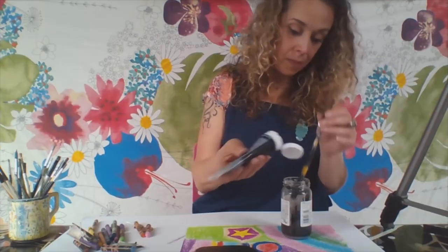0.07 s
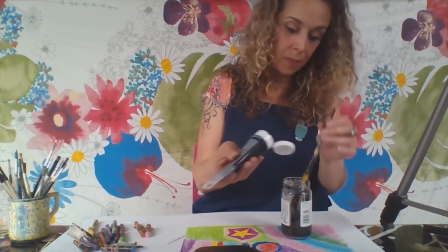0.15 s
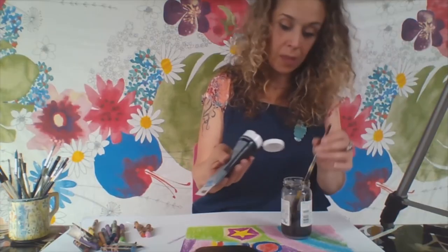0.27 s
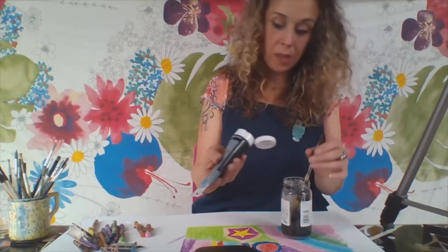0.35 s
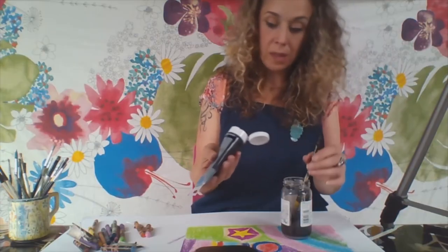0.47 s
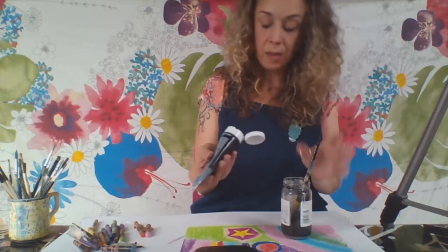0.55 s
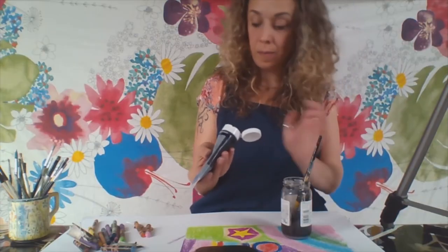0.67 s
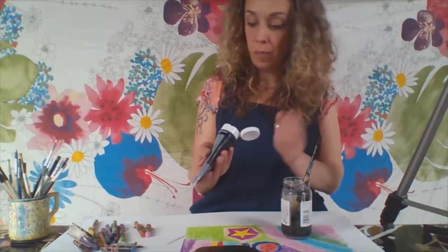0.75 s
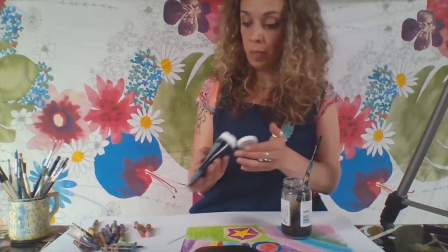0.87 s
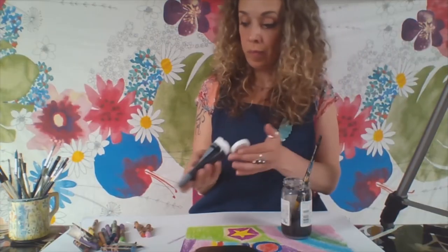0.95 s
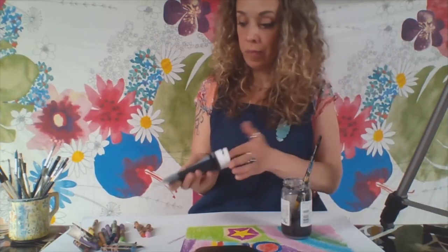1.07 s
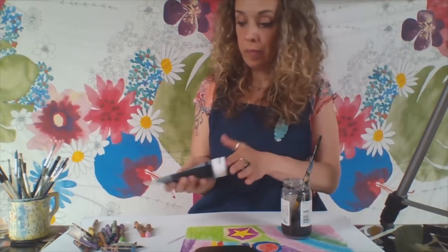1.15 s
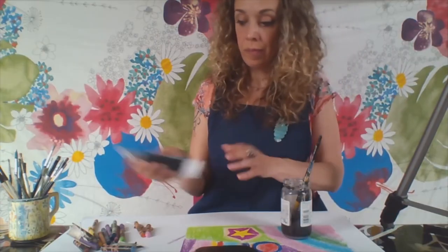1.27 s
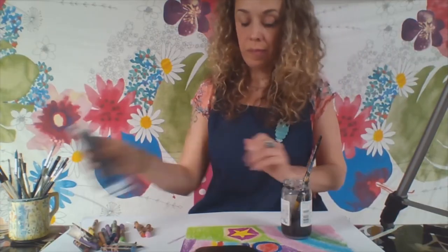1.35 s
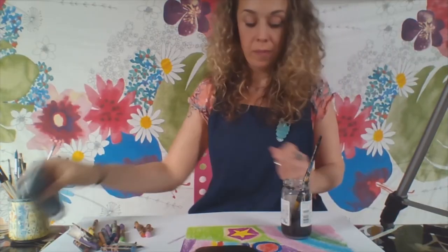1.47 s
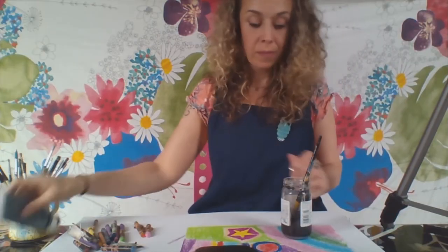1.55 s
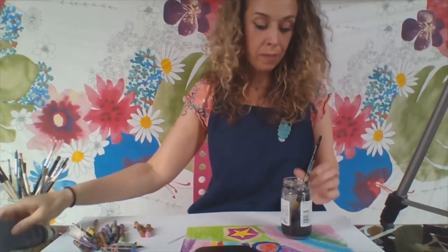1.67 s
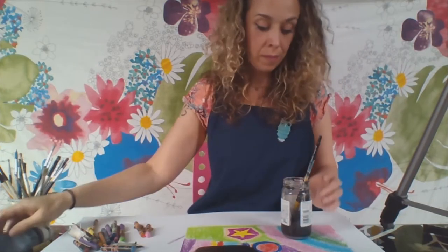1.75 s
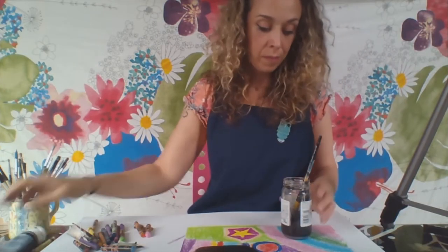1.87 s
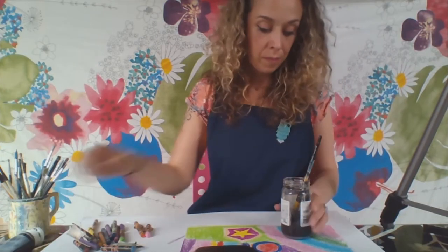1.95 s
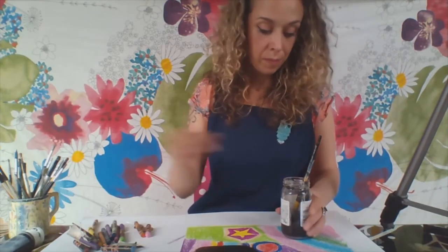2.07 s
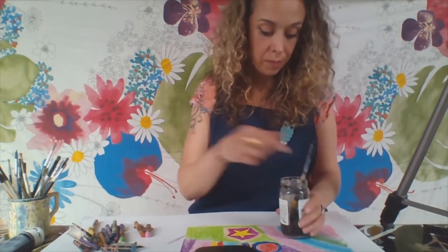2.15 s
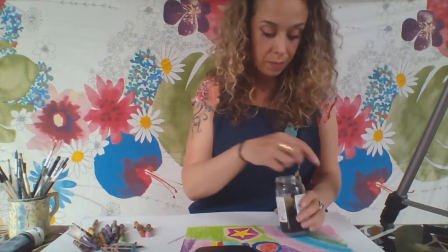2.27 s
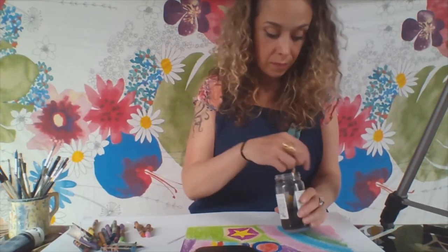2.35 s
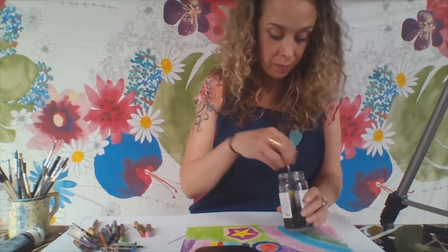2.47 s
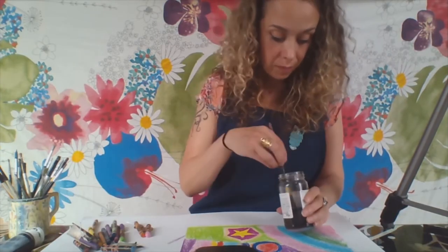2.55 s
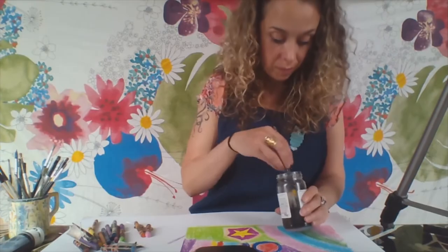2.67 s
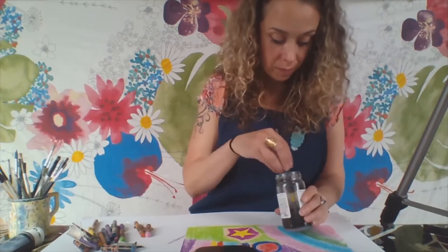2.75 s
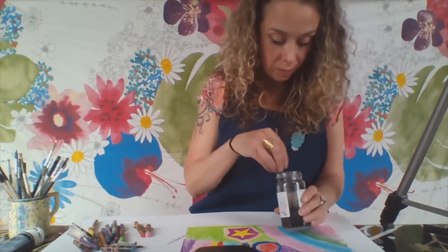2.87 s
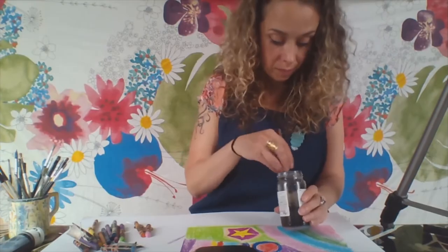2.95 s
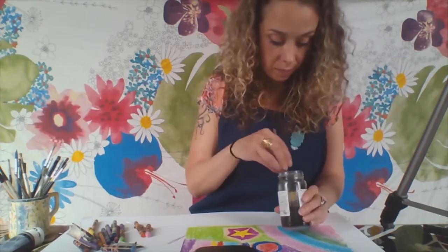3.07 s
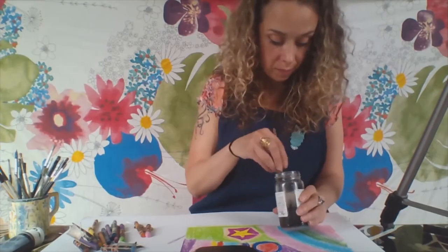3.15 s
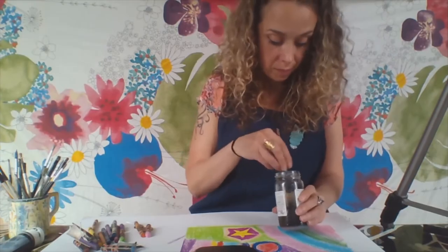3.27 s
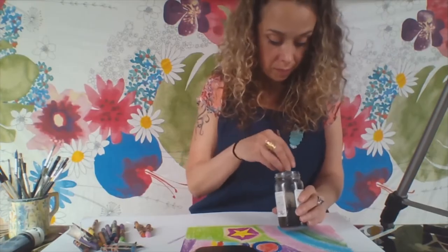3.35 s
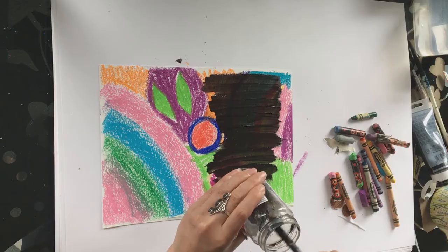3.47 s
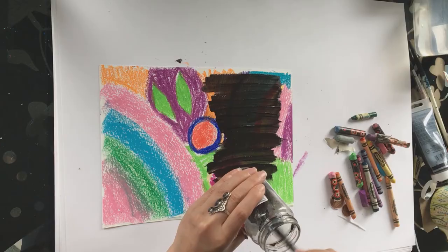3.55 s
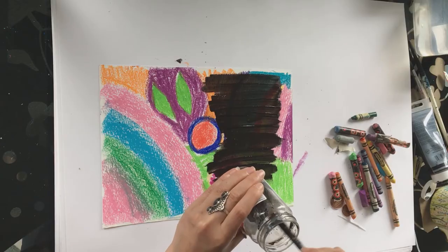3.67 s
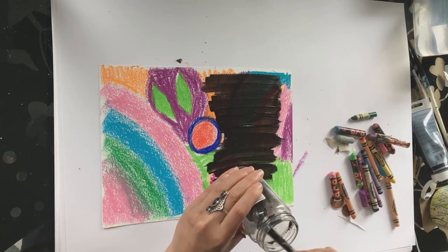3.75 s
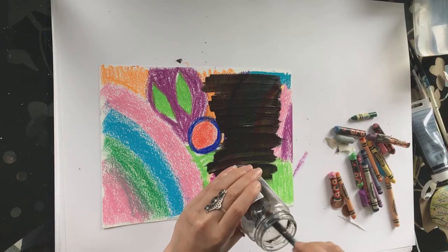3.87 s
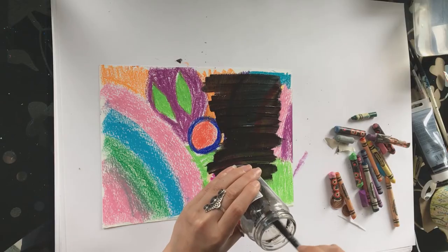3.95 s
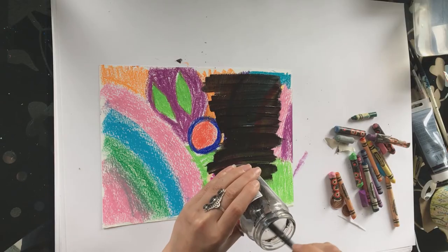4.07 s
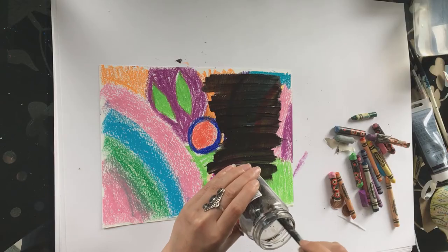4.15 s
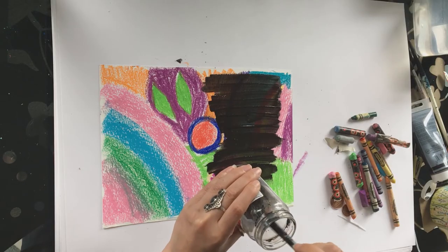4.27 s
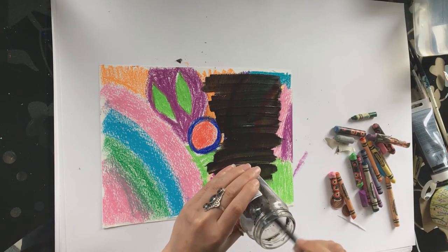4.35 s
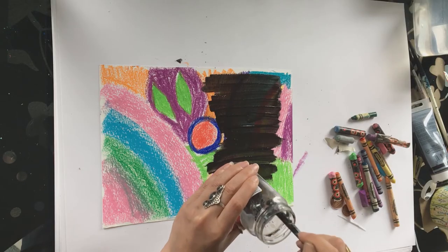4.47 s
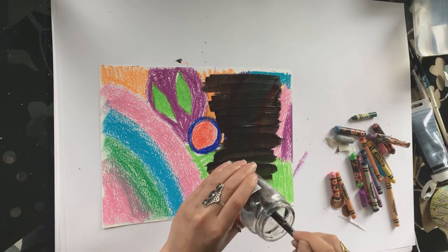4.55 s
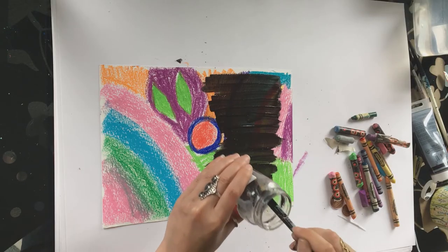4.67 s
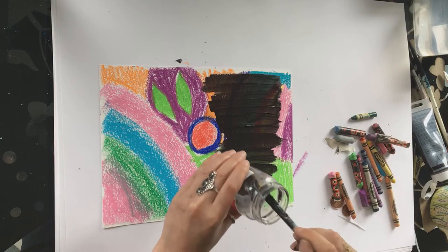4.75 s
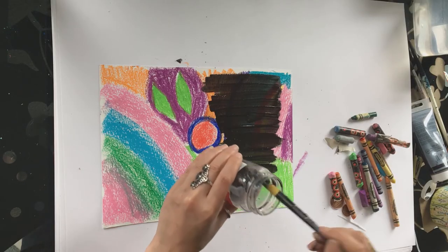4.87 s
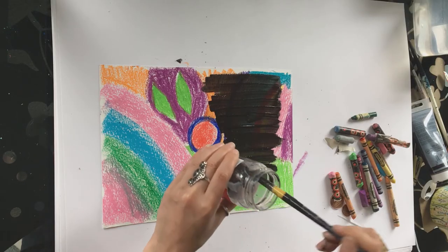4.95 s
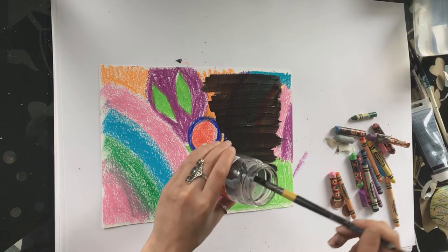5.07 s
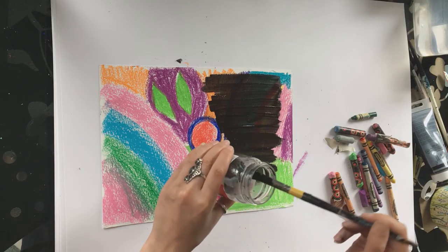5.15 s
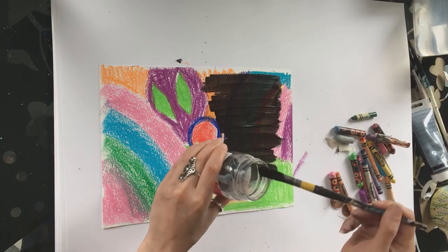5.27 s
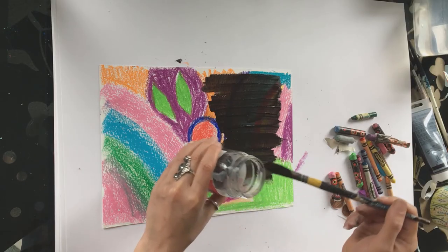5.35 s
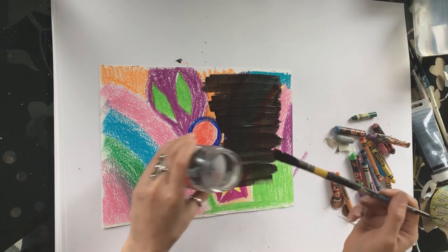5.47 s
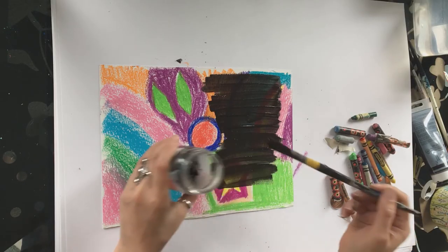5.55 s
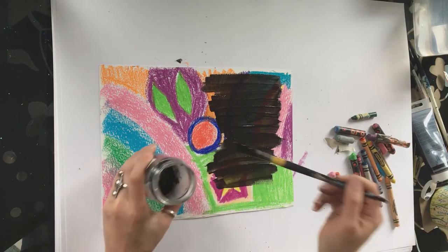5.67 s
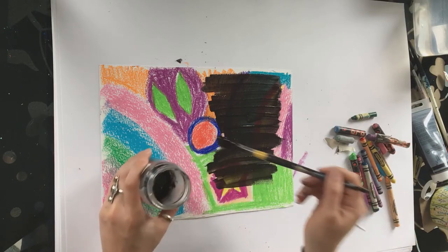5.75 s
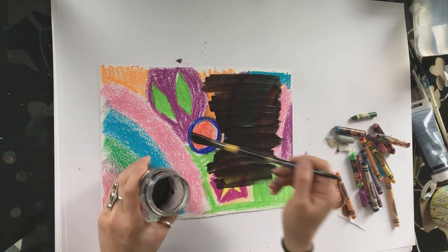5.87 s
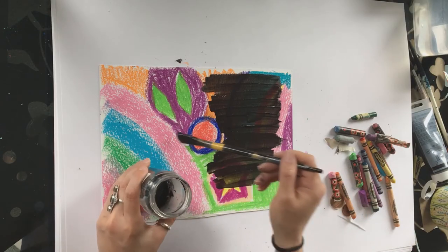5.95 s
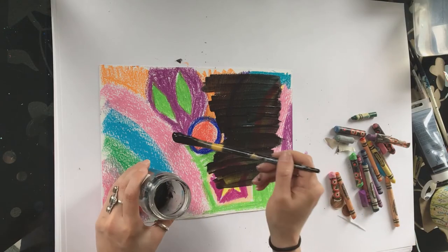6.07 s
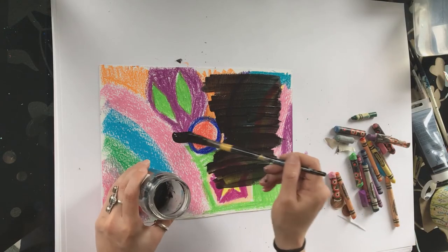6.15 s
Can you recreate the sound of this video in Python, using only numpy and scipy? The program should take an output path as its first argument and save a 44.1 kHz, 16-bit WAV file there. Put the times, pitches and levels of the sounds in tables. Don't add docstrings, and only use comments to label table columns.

```python
import sys
import numpy as np
from scipy import signal
from scipy.io import wavfile
from scipy.ndimage import uniform_filter1d

SR = 44100
rng = np.random.default_rng(int(sys.argv[2]) if len(sys.argv) > 2 else 0)


def digitize_waveform(pressure):
    field = np.atleast_2d(pressure).T
    bounded = np.clip(field, -1, 1)
    quanta = np.round(bounded * 32767).astype(np.int16)
    wavfile.write(sys.argv[1], SR, quanta)


def attenuation_scalar(level_db):
    decades = np.asarray(level_db, float) / 20
    return 10 ** decades


N = 274028

# (f/Hz, level/dB, time to fall 60 dB/s)
HAND_MODES = [(254, 2.5, 0.028), (411, 2, 0.028), (702, -7.5, 0.029), (1430, 9, 0.0091), (1780, 7, 0.014)]


def evened(x):
    return x / np.sqrt(np.mean(x ** 2) + 1e-20)


def read(points, hz):
    f, value = np.transpose(points)
    return np.interp(np.log(hz + 1), np.log(f + 1), value)


def add(mix, s, sound):
    part = mix[round(s * SR):][:len(sound)]
    part += sound[:len(part)]


def rings(modes, rise=0.00061, spread_db=0, detune=0, damp=1):
    hz, db, t60 = np.transpose(modes)[:, :, None]
    t60 = np.abs(damp * t60)
    t = np.arange(int(SR * t60.max())) / SR
    spot, size = rng.uniform(-1.15, 1, (len(modes), 2)).T[:, :, None]
    fading = attenuation_scalar(db + spread_db * size - 60 * t / t60)
    waves = fading * np.sin(2 * np.pi * hz * (1 + detune * spot) * t)
    soft_start = 1 - np.exp(-(t / rise) ** 2)
    return waves.sum(0) * soft_start


def crack(db, hz, t60, width=2.5, order=2):
    t = np.arange(2048) / SR
    limits = [hz / width, min(hz * width, .45 * SR)]
    band = signal.butter(order, limits, "bandpass", fs=SR, output="sos")
    burst = attenuation_scalar(-60 * t / abs(t60)) * rng.standard_normal(2048)
    return attenuation_scalar(db) * signal.sosfilt(band, burst)


def noise(level_db, size):
    frames, hz = 4 * N // size + 5, np.fft.rfftfreq(size, 1 / SR)
    a, b = rng.standard_normal((frames, len(hz), 2)).T
    gain = attenuation_scalar(level_db(hz[:, None], np.arange(frames) * size / 4 / SR))
    gain /= np.sqrt((gain ** 2).mean(0))
    sound = signal.istft((a + 1j * b) * gain, nperseg=size, noverlap=3 * size // 4)[1]
    return evened(sound[:N])


def coloured(x, points):
    log_gain = np.log(attenuation_scalar(read(points, np.abs(np.fft.fftfreq(2048, 1 / SR)))))
    taps = np.fft.ifft(np.exp(log_gain - 1j * signal.hilbert(log_gain).imag)).real[:1024]
    return signal.oaconvolve(x, taps)[:N]


def blow(modes, crack_db, crack_hz, tick_db, hand_db, damp, split):
    out = np.zeros(SR)
    add(out, 0, rings(modes, rise=0.00074, damp=damp))
    add(out, 0, attenuation_scalar(-3) * rings(modes, rise=0.0008, spread_db=2, detune=split, damp=.9 * damp))
    add(out, 0, crack(crack_db, crack_hz, t60=0.022, width=2.46, order=4))
    add(out, 0, crack(tick_db, hz=11300, t60=0.018, width=1.5))
    add(out, 0, attenuation_scalar(hand_db) * rings(HAND_MODES, rise=0.003, spread_db=4, detune=0.05))
    return out


def brush_drop():
    # (f/Hz, level/dB, time to fall 60 dB/s)
    loose_jar = [(676, -46, 0.16), (1900, -48, 0.05), (4165, -48, .15), (4282, -38.5, 0.36),
                 (5700, -64, 0.3), (7110, -47, 0.42), (7200, -50, 0.3), (12480, -70, .2), (14810, -71, 0.4)]
    # (time after the drop/s, level/dB)
    bounces = [
        (.058, -11),
        (.102, -12),
        (.134, -10),
    ]
    drop_s = .1942
    out = np.zeros(N)
    add(out, drop_s, blow(loose_jar, crack_db=-26, crack_hz=1900, tick_db=-43, hand_db=-32,
                          damp=1.0, split=0.0072))
    for later, bounce_db in bounces:
        add(out, drop_s + later, attenuation_scalar(bounce_db) * rings(loose_jar, rise=.003, damp=.6))
    return out


def clinks():
    # (t/s, strength/dB, hardness/dB per octave, upper rings near the rim/dB, ring length left [share])
    clink_blows = [
        (3.116, -40.5, -11.5, -12, 0.54),
        (3.1325, -46, -4, 9.5, 0.41),
        (3.489, -35.5, 1, 1, 0.5),
        (3.7969, -29, 1.5, 7, 0.4),
        (4.0706, -27, -6, -2.5, 0.52),
        (4.3673, -30, 3, -6, 0.88),
    ]
    paint_pitch = [(1.02, 1.005), (1.015, 1.007), (1.012, 1.062), (.998, 1), (.983, 1.01), (1.037, 1.035)]
    held_hz = [1295, 2070, 2280, 2570, 3960, 4125, 4330, 6250, 6560, 6880, 8030, 11100, 12450]
    # (level/dB, time to fall 60 dB/s)
    held_rings = [(-15.5, 0.019), (-12, .022), (0.5, 0.048), (-2, 0.026), (-8, 0.031), (-0.5, 0.07),
                  (-3, 0.054), (-6.5, 0.063), (-12, 0.022), (2.5, 0.036), (-15, 0.023), (-17, 0.019),
                  (-15, 0.023)]
    wall_hz = (3000, 5500, 7500)
    pivot_hz = 4100
    out = np.zeros(N)
    hz = np.array(held_hz)
    share_db, t60 = np.transpose(held_rings)
    family = np.searchsorted(wall_hz, hz)
    for (s, db, hard, upper_db, grip), pitch in zip(clink_blows, paint_pitch):
        tuned_hz = hz * np.array([1, *pitch, 1])[family]
        hardness_db = hard * np.log2(hz / pivot_hz) * (hz < wall_hz[-1])
        tone_db = db + share_db + hardness_db + upper_db * (family == 2)
        modes = np.transpose([tuned_hz, tone_db, t60])
        add(out, s, blow(modes, crack_db=db + 6 + 0.33 * hard, crack_hz=3200 * 2 ** (0.019 * hard),
                         tick_db=db - 17, hand_db=db - 3.5 - 0.56 * hard, damp=grip, split=.017))
    return out


def collar_and_set_down():
    # (f/Hz, level/dB, time to fall 60 dB/s)
    collar = [(6900, -42, .018), (8600, -38, .015), (9690, -39, .035), (11700, -36, 0.02),
              (13400, -34.5, .02)]
    # (t/s, level/dB)
    down_s, down_db = (5.9815, -34.5)
    out = np.zeros(N)
    add(out, 4.6324, blow(collar, crack_db=-40, crack_hz=7000, tick_db=-42, hand_db=-70, damp=.5, split=.02))
    add(out, down_s, attenuation_scalar(down_db) * rings(HAND_MODES, rise=.0022, damp=.7))
    return out


def drops():
    # (t/s, level/dB, start f/Hz, end f/Hz, length/s)
    glides = [
        (2.332, -63, 6200, 7000, .008),
        (2.351, -53, 5750, 5850, .014),
        (2.8, -64, 5500, 5600, .03),
        (4.452, -63, 5820, 5920, 0.06),
        (.953, -59, 7600, 9800, .04),
        (0.935, -59, 5400, 5450, .015),
        (.97, -62, 5400, 5400, .04),
        (.29, -63, 5800, 5950, .07),
    ]
    out = np.zeros(N)
    for s, db, start_hz, end_hz, length in glides:
        waver = 1 + .007 * evened(uniform_filter1d(rng.standard_normal(4410), size=200))
        hz = np.linspace(start_hz, end_hz, int(length * SR))
        turns = np.cumsum(hz * waver[:len(hz)]) / SR
        add(out, s, attenuation_scalar(db) * np.sin(2 * np.pi * turns) * np.hanning(len(hz)))
    return out


def glass():
    return brush_drop() + clinks() + collar_and_set_down() + drops()


def snap():
    # (f/Hz, level/dB, time to fall 60 dB/s)
    (s, db), modes = (1.0259, -24), [(181, -49, 0.053), (360, -28, 0.022), (480, -22, 0.012),
                      (827, -35, 0.041), (1560, -30, 0.021), (2300, -32, 0.013), (4100, -28.5, 0.0091)]
    out = np.zeros(N)
    add(out, s, rings(modes, rise=0.00049))
    add(out, s, crack(db, hz=4000, t60=0.014, width=2.8))
    return out


def knocks():
    # (f/Hz, level/dB, time to fall 60 dB/s)
    table_top = [(185, -8, 0.08), (285, -4, 0.12), (443, 2.5, 0.095), (550, 2, 0.06), (592, -4, .05)]
    tube_wall = [(1431, 2.5, 0.061), (1700, 6.5, 0.046), (1866, 1, 0.025), (2310, 5, 0.024),
                 (2670, -4.5, 0.05)]
    cap = [(3340, 4.3, 0.0092), (3900, 7.4, 0.026), (4450, 5.2, 0.027)]
    crayons = [(5950, -4, .009), (6645, 16, 0.017), (7200, -5, 0.0072)]
    # (t/s, table level/dB, tube level/dB, cap level/dB, crayon level/dB)
    hits = [(1.6036, -56, -37.5, -33.5, -48), (1.614, -66, -47, -35, -41),
            (1.702, -32.5, -22.5, -19.5, -37), (1.8464, -36, -24, -23.5, -30),
            (1.851, -32.5, -22.5, -28, -36), (1.874, -28.5, -59, -52, -56), (1.893, -22, -51, -52, -52),
            (1.8988, -20.5, -31, -30, -16.5), (1.904, -22.5, -28, -41, -36), (1.913, -35, -53, -28, -31),
            (1.929, -24, -14, -25, -38), (1.954, -26.5, -44, -46, -50), (1.9637, -28, -49, -53, -19),
            (1.967, -12.5, -26, -54, -31), (1.978, -33, -50, -58, -40), (2.016, -39, -43, -55, -51),
            (2.035, -35, -44, -60, -60), (2.0539, -35.5, -36, -64, -46.5), (5.983, -42, -58, -54, -66)]
    out = np.zeros(N)
    for s, table_db, *parts_db in hits:
        add(out, s, attenuation_scalar(table_db - 3.5) * rings(table_top, rise=0.002, detune=0.007))
        for db, body in zip(parts_db, (tube_wall, cap, crayons)):
            add(out, s, attenuation_scalar(db - 10.0) * rings(body, spread_db=4.5, detune=0.05, damp=0.69))
            add(out, s, crack(db + 4.5, body[1][0], t60=0.028, width=1.416))
        add(out, s, crack(parts_db[-1] + 5.0, hz=8950, t60=0.009, width=1.41))
    return out


def rubbing():
    # (peak t/s, level/dB, swell over 23.5 dB/s, fade over 23.5 dB/s, brightness/dB per octave)
    rubs = [(.72, -66, 0.099, .17, 10), (.975, -53.5, 0.066, 0.23, 2), (1.035, -55, .06, .09, -5),
            (1.35, -61, 0.26, 0.27, 5), (1.611, -39.5, 0.014, 0.13, 1), (1.75, -45, 0.11, 0.15, 0.5),
            (1.86, -39, 0.019, 0.033, -2.5), (1.91, -33.5, 0.035, 0.063, -1.5),
            (1.98, -33, 0.081, 0.062, -2.5), (2.07, -42, 0.24, 0.073, -4.5), (2.55, -72, .9, 0.74, 9),
            (2.95, -71, 0.43, 0.65, 8), (5.75, -67, .23, .4, 4), (5.948, -64, 0.26, 0.43, -1.5)]
    # (f/Hz, level/dB)
    rub_colour = [(300, 0), (1000, 5.5), (2000, -6), (4000, 1.5), (5000, -2.5), (6500, 0.5), (8500, -7),
                  (10500, -5), (13000, -9), (16000, -21)]
    s, level_db, swell, fade, tilt = np.transpose(rubs)[:, :, None]
    t = np.arange(N) / SR
    away = np.maximum((s - t) / np.abs(swell), (t - s) / np.abs(fade))
    power = attenuation_scalar(2 * level_db - 47 * away) + 1e-12
    bright = (power * tilt).sum(0) / power.sum(0)

    def colour_db(hz, at):
        return read(rub_colour, hz) + np.interp(at, t, bright) * np.log2((hz + 50) / 4000)

    hiss = noise(colour_db, size=256)
    grain = attenuation_scalar(2.0 * evened(uniform_filter1d(rng.standard_normal(N), size=90)))
    return np.sqrt(power.sum(0)) * evened(hiss * grain)


def thuds():
    # (t/s, level/dB, f/Hz, time to fall 60 dB/s)
    pushes = [
        (1.03, -44, 69.6, 0.25),
        (1.71, -38, 119, 0.15),
        (1.93, -47, 65, .2),
        (2.017, -37.5, 68.6, 0.33),
        (2.091, -44, 108, 0.13),
        (5.984, -38, 184, 0.066),
        (5.997, -39, 78.6, 0.07),
        (6.025, -32.5, 62.5, 0.11),
        (6.061, -39, 60, 0.067),
    ]
    out = np.zeros(N)
    for s, db, hz, t60 in pushes:
        add(out, s, rings([(hz, db, t60)], rise=0.0034))
    return out


def flicks():
    # (t/s, level/dB)
    bristle_flicks = [
        (4.063, -58),
        (4.118, -41),
        (4.143, -57),
        (2.127, -47),
        (3.063, -58),
    ]
    out = np.zeros(N)
    for s, db in bristle_flicks:
        add(out, s, crack(db, hz=11000, t60=0.0055, width=1.2))
    return out


def room(tail_db, build, echo_db):
    # (f/Hz, level/dB)
    room_colour = [(200, -7.5), (600, -3), (1500, -3.5), (4000, 1.5), (7000, -2.5), (9500, -1), (16000, 3)]
    # (f/Hz, time to fall 60 dB/s)
    room_t60 = [(200, 0.067), (1000, 0.37), (2500, 0.21), (4500, 0.23), (7000, 0.19), (12000, 0.18)]
    # (delay/s, level/dB)
    echoes = [(.0015, -6.5), (.0035, -12.5), (.0062, -12.5), (.011, -13), (.016, -11.5), (.021, -12.5),
              (.026, -19.5)]
    taps = np.zeros(SR // 2)
    at = np.arange(40, SR // 2 - 20, 20)
    taps[at + rng.integers(0, 20, len(at))] = rng.choice([-1., 1.], len(at))
    hz, t, z = signal.stft(taps, SR, nperseg=256)
    fading_db = read(room_colour, hz)[:, None] - 60 * t / read(room_t60, hz)[:, None]
    tail = signal.istft(z * attenuation_scalar(fading_db), SR, nperseg=256)[1]
    tail *= 1 - np.exp(-np.arange(len(tail)) / SR / build)
    tail *= attenuation_scalar(tail_db) / np.linalg.norm(tail)
    for k, (s, db) in enumerate(echoes):
        tail[round(s * SR)] += (-1) ** k * attenuation_scalar(db + echo_db)
    tail[0] = 1
    return tail


def air():
    # (f/Hz, level/dB per Hz)
    air_colour = [(15, -47), (25, 3), (53, 0), (232, -4.5), (496, -11), (538, -9.5), (979, -8.5),
                  (2150, -14), (2530, -11), (2750, -16.5), (4240, -20.5), (7510, -26), (13300, -30.5),
                  (15200, -33), (16500, -49)]
    # (f/Hz, width/Hz, level/dB)
    fan_modes = [(59, 26, 7), (1332, 520, 1), (1742, 18, 4), (2480, 120, 0), (3470, 1170, -6),
                 (4190, 470, -9.5), (5450, 250, -13.5)]
    change_s, dip_s, dip_db = 4.55, 0.16, -3
    since = np.arange(N) / SR - change_s
    after = np.clip(since / 0.026 + .5, 0, 1)
    dip = dip_db * np.clip(1 + since / dip_s, 0, 1) * (1 - after)

    def fan_db(f, s):
        peaks = sum(attenuation_scalar(db) / (1 + (2 * (f - hz) / width) ** 2) for hz, width, db in fan_modes)
        return 20 * np.log10(peaks) + 0 * s

    hiss = noise(lambda hz, s: read(air_colour, hz) + 0 * s, size=2048)
    fan = noise(fan_db, size=2048)
    return attenuation_scalar(-53.5 + dip + 0.4 * after) * hiss + attenuation_scalar(-58 + 3.5 * after) * fan


def ticks():
    # (first t/s, last t/s)
    tick_runs = [
        (.0468, 4.52),
        (4.5378, 6.2),
    ]
    # (f/Hz, level/dB, time to fall 60 dB/s)
    tick_modes = [(6720, -45.5, 0.0029), (7950, -61, 0.00079), (12300, -58, .003), (8550, -53, 0.0034),
                  (4900, -88, 0.0037)]
    out = np.zeros(N)
    for first, last in tick_runs:
        for k, s in enumerate(np.arange(first, last, 1 / 20)):
            late = (k % 2 == 0) * (first < 1) * .003 * rng.random() ** 2
            add(out, s + late, rings(tick_modes, rise=0.000069, spread_db=1.0)[:1024])
    return out


def scene():
    # (f/Hz, level/dB)
    path_colour = [(100, -2), (2700, 2.5), (3050, 0), (3500, 1), (4500, 0.5), (5000, -6.5), (5800, 0),
                   (7300, -1), (8000, -4), (9500, -5), (12500, -1.5), (13400, -4.5), (15700, 6),
                   (16000, -22)]
    spots = [(glass(), room(tail_db=-6.5, build=0.007, echo_db=-4.0)),
             (knocks(), room(tail_db=-5, build=0.0067, echo_db=-4)),
             (snap(), room(tail_db=-11.0, build=0.0059, echo_db=-6.0))]
    near = sum(signal.oaconvolve(x, path)[:N] for x, path in spots)
    return (coloured(near, path_colour) + rubbing() + thuds() + air() + flicks())[None]


def low_pass(x):
    return signal.sosfilt(signal.butter(12, 16970, fs=SR, output="sos"), x)


def record(dry):
    # (f/Hz, level/dB)
    mic_colour = [(100, 0), (9700, 0), (10400, -3.5), (11100, 0.5), (16700, 1), (17000, -73)]
    low_cut = signal.butter(2, 35, "highpass", fs=SR, output="sos")
    heard = coloured(signal.sosfilt(low_cut, dry[0] + ticks()), mic_colour)
    return low_pass(heard[None])


dry = scene()
out = record(dry)
digitize_waveform(out)
```